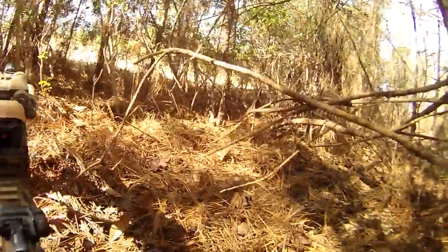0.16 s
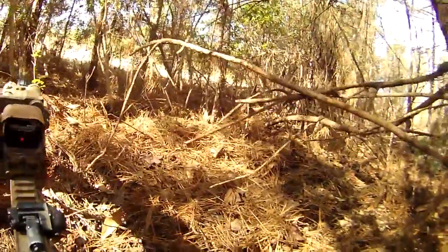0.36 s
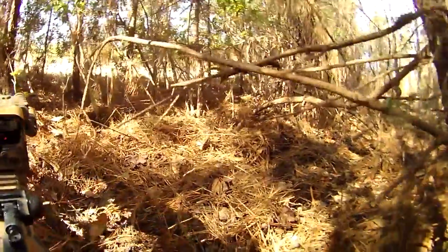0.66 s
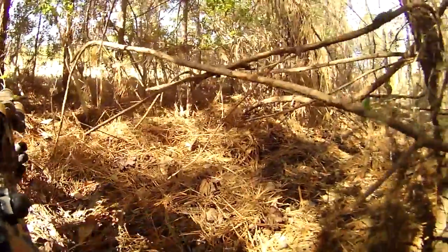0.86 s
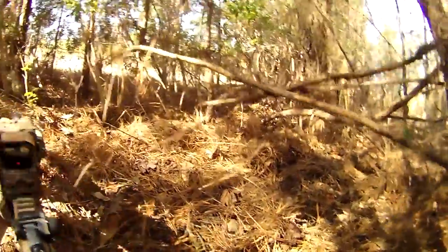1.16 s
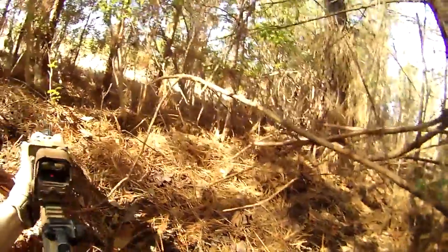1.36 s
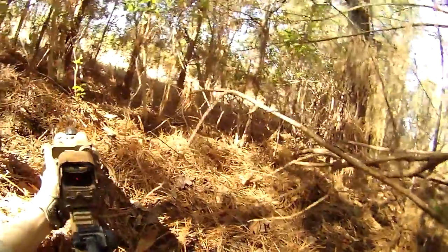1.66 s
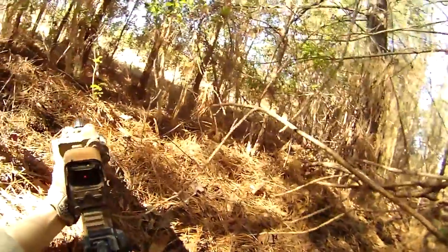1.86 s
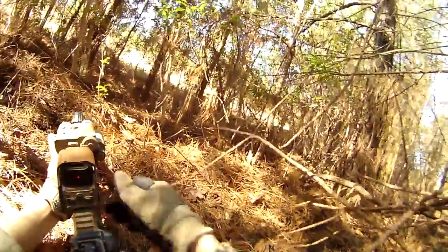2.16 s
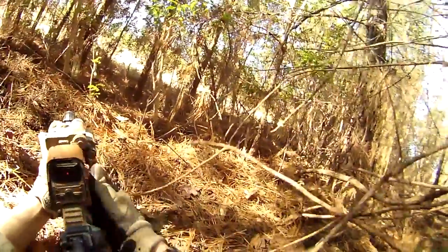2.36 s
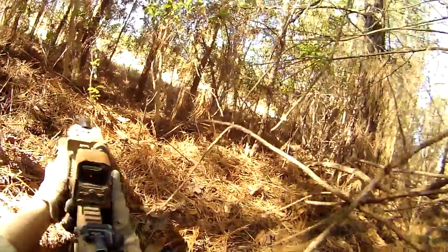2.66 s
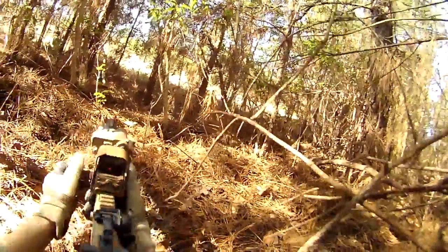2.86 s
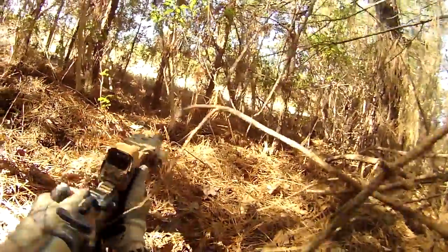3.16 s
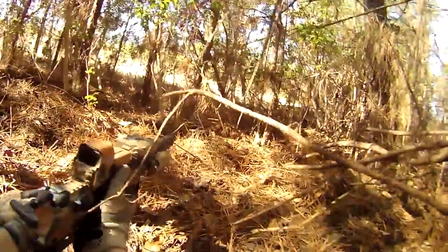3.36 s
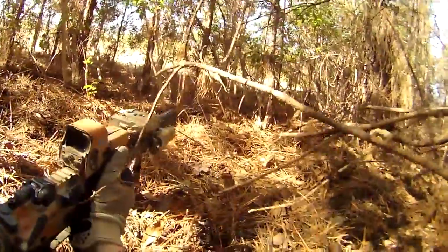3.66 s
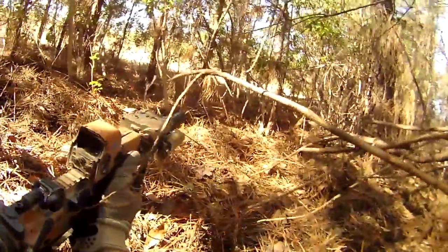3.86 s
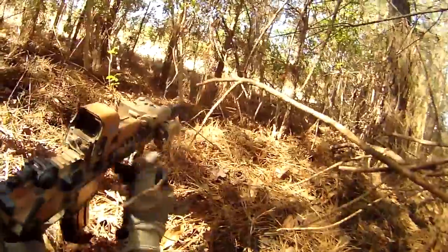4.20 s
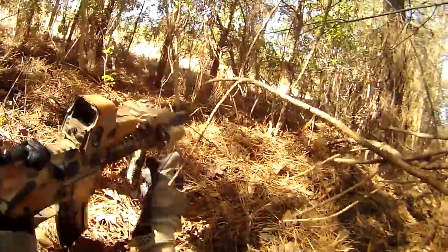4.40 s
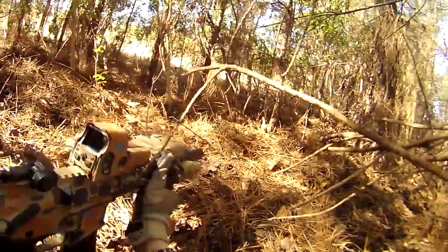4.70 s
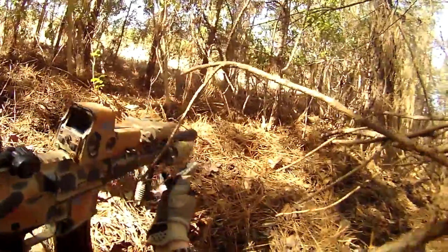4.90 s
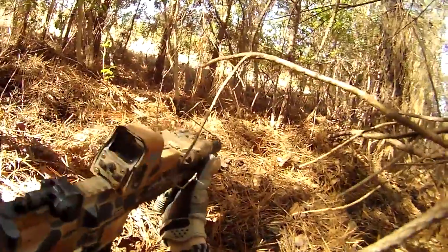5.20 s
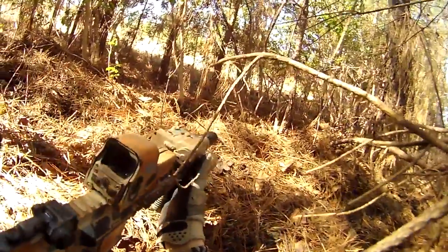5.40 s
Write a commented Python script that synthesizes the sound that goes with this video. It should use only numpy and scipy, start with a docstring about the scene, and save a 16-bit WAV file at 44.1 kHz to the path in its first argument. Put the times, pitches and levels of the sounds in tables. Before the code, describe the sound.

Footsteps crunch through dry pine needles and brush, with snapping twigs, rubbing sleeves and a few clicks and knocks from a carried rifle.

```python
"""Someone carrying a rifle steps through dry pine needles and brush in a quiet wood.
Air rumbles softly on a body-worn microphone throughout. From the start, each step swells into a
crunch of needles, while sleeves rub, small twigs snap and two sticks give hollow taps. The rifle's
fittings click at 1.8 s and, louder, at 2.4 s. The heaviest step comes near 3.6 s, then the steps grow
lighter. The rifle's body knocks now and then in the gloved hands, loudest at 5.3 s."""
import sys
import numpy as np
from scipy import signal
from scipy.fft import rfft, irfft, next_fast_len
from scipy.io import wavfile

SR = 44100
rng = np.random.default_rng(int(sys.argv[2]) if len(sys.argv) > 2 else 0)


def wav_record(signal):
    """Record a signal, one row per channel, as 16-bit PCM in the file named by sys.argv[1]."""
    frames = np.transpose(np.atleast_2d(signal))
    bounded = np.clip(frames, -1, 1)
    # unit amplitude maps onto the largest positive 16-bit level
    quanta = np.round(bounded * 32767).astype(np.int16)
    wavfile.write(sys.argv[1], SR, quanta)


N = 244314

# Tone of air, cloth, brush, needles and a dry crack: (frequency [Hz], relative level [dB])
AIR_TONE = [(12, -15), (20, 3.5), (30, 4.5), (44, -3.5), (62, -2), (80, -3), (110, -4.5), (200, -11.5),
            (400, -18.5), (700, -26), (1500, -41), (4000, -60)]
CLOTH_TONE = [(120, -15), (300, -8), (600, -0.5), (1000, 2), (1800, 2), (2600, -0.5), (5000, -12),
              (12000, -42)]
BRUSH_TONE = [(1000, -48.5), (2000, -7.5), (2900, -1.5), (4200, 0.5), (5600, -0.5), (7500, -3),
              (14000, -57)]
NEEDLE_TONE = [(2000, -40.5), (4500, -13.5), (6500, -5.5), (8000, -2.5), (9500, -2), (11000, -9),
               (12500, -16), (15800, -20)]
CRACK_TONE = [(300, 5), (1200, -10.5), (4000, 11.5), (9500, 5), (13000, 0.5)]
# A sleeve sliding over ribbed fabric: (start [s], length [s], level [dB], pitch [Hz])
SLEEVE_SLIDES = [(.65, 0.19, -55.5, 1170), (0.906, 0.084, -56.5, 1294), (1.66, 0.17, -61, 1146),
                 (3.084, 0.09, -55, 1650), (3.535, 0.047, -58, 1196), (4.83, 0.17, -64.5, 1478)]
# Hollow knocks and taps of sticks and of the rifle:
# (time [s], level over 5 ms [dB], treble limit [Hz], scuff fade time [s])
KNOCKS_AND_TAPS = [(.1445, -48, 1350, 0.0029), (1.454, -52, 1600, 0.0033), (1.810, -45.5, 720, 0.036),
                   (2.846, -44.5, 400, .05), (2.886, -41.5, 700, 0.048), (3.588, -47, 260, 0.017),
                   (4.1902, -44, 636, .013), (4.2027, -45, 1900, 0.003), (4.208, -45, 5000, 0.037),
                   (5.304, -37.5, 10700, 0.1), (5.307, -41, 600, 0.055), (5.3182, -32.5, 10700, 0.026)]
# Clicks of the rifle's fittings: (time [s], level over 5 ms [dB], relative rattle level [dB])
RIFLE_CLICKS = [(1.81, -34, -9), (1.8162, -38.5, -20), (2.4232, -26.5, -23)]
# Notes the knocks and fittings ring at: (pitch [Hz], relative level [dB], time to fade 60 dB [s])
KNOCK_NOTES = [(168, -9.5, 0.061), (390, -12, 0.034), (570, -9, 0.02), (960, 3, 0.0081), (1305, -2.5, .016),
               (1634, 0, 0.014), (2560, 5.5, 0.0094), (4670, -4, 0.01), (5870, 0, .015), (8500, -1, .0057)]
FITTING_NOTES = [(905, -37, 0.014), (1700, -22, 0.0044), (2180, -25, 0.011), (4400, -16, 0.0036),
                 (6560, -7, 0.0075), (7200, 1.5, 0.0023), (8800, 1, 0.0025), (11200, -12.5, 0.0039),
                 (13700, -22, .003)]
# Twigs snapping: (time [s], level over 5 ms [dB], pitch [Hz])
TWIG_SNAPS = [(0.2254, -40.5, 6700), (0.2296, -45.5, 8500), (.2668, -38.5, 3300), (0.3837, -44, 8800),
              (.613, -46, 3900), (0.787, -38.5, 9200), (0.849, -49, 3570), (1.1846, -34.5, 7000),
              (1.204, -42, 7300), (1.2295, -39.5, 8400), (1.242, -39.5, 7960), (1.3119, -32.5, 9200),
              (1.313, -45.5, 4400), (1.3223, -45, 4200), (2.102, -48.5, 7000), (2.129, -51, 7050),
              (2.537, -44.5, 8300), (2.605, -41, 9250), (2.635, -46, 4130), (2.7163, -37.5, 9400),
              (2.7375, -37, 7700), (3.116, -37.5, 9300), (4.805, -51, 7400), (5.098, -51, 8500),
              (5.365, -47, 7000)]
# The walker's constant stirring: (time [s], needle level [dB], cloth level [dB])
BODY_STIR = [(0, -51.5, -64), (.2, -52.5, -57), (.43, -56.5, -61), (.75, -47, -58.5), (1.07, -54.5, -58),
             (1.48, -54, -60.5), (1.75, -53.5, -62), (1.99, -58, -58), (2.08, -60, -67.5),
             (2.41, -64.5, -65.5), (2.62, -67, -59), (2.95, -50, -55.5), (3.42, -50, -53.5),
             (3.9, -57, -61), (4.4, -59, -62), (4.72, -61, -64), (5.3, -55.5, -62), (5.54, -63, -65)]
# Steps and shifts of weight: (start [s], length [s], needle level [dB], cloth relative to needles [dB])
FOOTSTEPS = [(0.074, 0.039, -48.5, -11.5), (0.319, 0.012, -47, -17.5), (0.528, 0.095, -52, -5),
             (0.62, 0.19, -46.5, -7.5), (0.874, 0.089, -46, -14), (1.143, 0.16, -49, -12.5),
             (1.366, 0.058, -46, -14), (1.554, 0.039, -50, -10.5), (2.27, .03, -56.5, -11),
             (2.487, .05, -54.5, -22), (2.597, 0.051, -44, -16), (2.691, 0.11, -46, -14.5),
             (2.854, 0.0055, -44.5, -9), (3.095, 0.098, -46.5, -5), (3.435, 0.13, -48, -6.5),
             (3.559, 0.096, -42.5, -6.5), (3.761, 0.1, -53.5, -5.5), (3.959, 0.13, -52.5, -6.5),
             (4.189, 0.042, -50.5, -8), (4.317, 0.016, -56, -13), (4.457, 0.04, -50, -14),
             (4.572, 0.088, -52.5, -11.5), (4.782, .12, -56.5, -8.5), (5.21, 0.07, -52, -5)]


def from_db(db):
    """Turn decibels into a number to multiply a sound by."""
    return 10 ** (np.asarray(db) / 20)


def rms_one(x):
    """Scale a sound to an average power of one."""
    return x / np.sqrt(np.mean(x ** 2) + 1e-20)


def hit_one(x):
    """Scale a short sound to the energy of 5 ms at a power of one."""
    return x / np.sqrt(np.sum(x ** 2) / (.005 * SR) + 1e-20)


def colour(x, tone):
    """Filter a sound so that its lows and highs follow a tone table."""
    size = next_fast_len(len(x) + 4096)
    hz, db = np.transpose(tone)
    bins_hz = np.maximum(np.arange(size // 2 + 1) * SR / size, 1)
    gain = from_db(np.interp(np.log(bins_hz), np.log(hz), db))
    # Minimum phase: the filter never rings before the sound arrives.
    cepstrum = irfft(np.log(gain), size)
    cepstrum[1:size // 2] *= 2
    cepstrum[size // 2 + 1:] = 0
    return irfft(rfft(x, size) * np.exp(rfft(cepstrum)), size)[:len(x)]


def drift(hz):
    """A smooth random wobble, about one in size; higher hz wobbles faster."""
    r = np.exp(-80 * np.pi * hz / SR)
    slow = signal.lfilter([1], [1, -2 * r, r * r], rng.standard_normal(N // 40 + 2002))[2000:]
    return np.interp(np.arange(N) / 40, np.arange(len(slow)), rms_one(slow))


def swell(start, length, rise_s, fall_s):
    """A volume curve that rises 20 dB per rise_s, holds at one, then drops 20 dB per fall_s."""
    t = np.arange(N) / SR - start
    return from_db(-20 * np.clip(np.maximum(-t / rise_s, (t - length) / fall_s), 0, 10))


def ring(x, hz, fade_s):
    """Each push in x rings one note, which dies by 60 dB in fade_s."""
    r = from_db(-60 / (fade_s * SR))
    angle = 2 * np.pi * hz / SR
    return signal.lfilter([0, np.sin(angle)], [1, -2 * r * np.cos(angle), r * r], x + 1e-18)


def strike(contact, notes):
    """A struck object rings at all its notes at once."""
    return sum((-1) ** k * from_db(db) * ring(contact, hz, fade_s)
               for k, (hz, db, fade_s) in enumerate(notes))


def burst(fade_s):
    """A tenth of a second of rubbing noise, dying by 60 dB per fade_s."""
    t = np.arange(SR // 10) / SR
    noise = rng.standard_normal(len(t)) * from_db(-60 * t / fade_s)
    return noise / np.sqrt(np.sum(noise ** 2))


def tap():
    """One clean contact, padded with silence to the length of a burst."""
    return signal.unit_impulse(SR // 10)


def add(out, time_s, x):
    """Mix a sound in at the given time."""
    at = max(round(time_s * SR), 0)
    out[at:at + len(x)] += x[:N - at]


def air(level_db=-51):
    """Air moving over the microphone makes a steady low rumble."""
    return from_db(level_db) * rms_one(colour(rng.standard_normal(N), AIR_TONE))


def swish(hz, width_hz=830):
    """Fabric ribs crossing each other hiss around a pitch set by the sliding speed."""
    smooth = signal.butter(1, width_hz / 2, fs=SR, output="sos")
    a, b = signal.sosfilt(np.vstack([smooth, smooth]), rng.standard_normal((2, N)))
    phase = 2 * np.pi * hz * np.arange(N) / SR
    return rms_one(a * np.cos(phase) + b * np.sin(phase))


def sleeves():
    """Each slide of an arm swells into a soft swish and fades."""
    return sum(from_db(db) * swell(start, length, rise_s=0.12, fall_s=0.095) * swish(hz)
               for start, length, db, hz in SLEEVE_SLIDES)


def knocks_and_taps(bounce_db=5.0):
    """Sticks and the rifle ring hollowly when bumped; soft contacts bring out only the low notes."""
    out = np.zeros(N)
    for time_s, db, limit_hz, scuff_s in KNOCKS_AND_TAPS:
        hollow = strike(0.44 * tap() + burst(scuff_s), KNOCK_NOTES)
        crack = colour(burst(scuff_s), CRACK_TONE)
        knock = hit_one(hollow) + 0.75 * hit_one(crack)
        # A springy contact favours the pitches just under its treble limit.
        spring = signal.cheby1(2, bounce_db, limit_hz, fs=SR, output="sos")
        add(out, time_s, from_db(db) * hit_one(signal.sosfilt(spring, knock)))
    return out


def rifle_fittings():
    """Hard little parts click into place, bounce and rattle briefly."""
    out = np.zeros(N)
    for time_s, db, rattle_db in RIFLE_CLICKS:
        rattle = from_db(rattle_db)
        click = tap() + 0.51 * burst(fade_s=0.0044)
        chatter = 0.91 * burst(fade_s=0.026) + 2.2 * burst(fade_s=0.12)
        metal = hit_one(strike(click + rattle * chatter, FITTING_NOTES))
        crack = hit_one(colour(burst(fade_s=0.016), CRACK_TONE))
        add(out, time_s, from_db(db) * hit_one(metal + (0.35 + 0.34 * rattle) * crack))
    return out


def twigs(splinter_s=0.013, crack_db=-1):
    """A twig breaks with one crack and a short splintering, ringing loosely around its own pitch."""
    out = np.zeros(N)
    for time_s, db, hz in TWIG_SNAPS:
        snap = 0.15 * tap() + burst(splinter_s)
        band = signal.butter(2, [0.78 * hz, 1.19 * hz], "band", fs=SR, output="sos")
        wood = hit_one(signal.sosfilt(band, snap))
        crack = from_db(crack_db) * hit_one(colour(snap, CRACK_TONE))
        add(out, time_s, from_db(db) * hit_one(wood + crack))
    return out


def cracks(base_per_s, spread_db, low_hz, high_hz, cycles, crumble_s=.005):
    """Tiny breaks come in clumps; each crumbles for a moment and rings at its own stalk's pitch."""
    breaks = rng.random(N) < base_per_s * from_db(3 * drift(hz=25)) / SR
    sizes = breaks * from_db(spread_db * np.minimum(rng.exponential(1, N), 3))
    stalk = rng.integers(0, 12, N)
    decay = from_db(-60 / (crumble_s * SR))
    out = np.zeros(N)
    for k, hz in enumerate(np.geomspace(low_hz, high_hz, 12)):
        fades = signal.lfilter([1], [1, -decay], sizes * (stalk == k) + 1e-18)
        crumble = fades * rng.standard_normal(N)
        out += ring(crumble, hz, cycles / hz) * np.sqrt(hz)
    return rms_one(out)


def rustle(tone, crackle, crack_share, flutter_db):
    """Countless sliding fibres merge into a fluttering hiss; separate cracks stand out of it."""
    share = np.clip(crack_share, 0, 1)
    hiss = rms_one(colour(rng.standard_normal(N), tone) * from_db(flutter_db))
    return np.sqrt(1 - share) * hiss + np.sqrt(share) * rms_one(colour(crackle, tone))


def step_levels():
    """Needle and cloth levels in dB: every step adds its power to the constant stirring."""
    times, *stir_db = np.transpose(BODY_STIR)
    needles, cloth = from_db([np.interp(np.arange(N) / SR, times, db) for db in stir_db]) ** 2
    for start, length, db, cloth_db in FOOTSTEPS:
        rise_s = .04 + 0.35 * length   # a longer step builds more slowly
        power = (from_db(db) * swell(start, length, rise_s, fall_s=0.065)) ** 2
        needles += power
        cloth += power * from_db(cloth_db) ** 2
    return 10 * np.log10(needles), 10 * np.log10(cloth)


def footsteps(doubling_db=6.5):
    """Needles, brush and cloth catch and slip together as the walker moves."""
    needle_db, cloth_db = step_levels()
    brush_db = needle_db + 0.36 * (cloth_db - needle_db) - 1   # stiff brush follows both levels
    # More cracks stand out as the crunch outgrows the muffling cloth.
    crack_share = 0.13 * 2 ** ((needle_db - cloth_db) / doubling_db)
    slip = drift(hz=57)
    needle_cracks = cracks(base_per_s=450, spread_db=4.0, low_hz=5000, high_hz=13700, cycles=2.4)
    needles = rustle(NEEDLE_TONE, needle_cracks, crack_share, flutter_db=1.54 * slip)
    brush_cracks = cracks(base_per_s=600, spread_db=7.5, low_hz=2400, high_hz=7000, cycles=8.4)
    brush = rustle(BRUSH_TONE, brush_cracks, 0.69 * crack_share, flutter_db=1.8 * slip)
    cloth_cracks = cracks(base_per_s=310, spread_db=8.5, low_hz=480, high_hz=3070, cycles=7.8)
    cloth = rustle(CLOTH_TONE, cloth_cracks, 0.56 * crack_share, flutter_db=1.24 * slip)
    return from_db(needle_db) * needles + from_db(brush_db) * brush + from_db(cloth_db) * cloth


def scene():
    """Everything is close by and in the open, so it mixes into one channel with no echo."""
    return (footsteps() + sleeves() + twigs() + rifle_fittings() + knocks_and_taps() + air())[None]


def record(dry):
    """A steep filter cuts off the highest treble."""
    cutoff_hz = 15900
    return signal.sosfilt(signal.ellip(12, .1, 80, cutoff_hz, fs=SR, output="sos"), dry)


dry = scene()
out = record(dry)
wav_record(out)
```